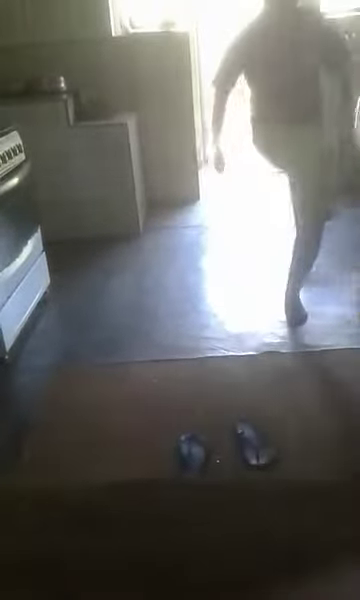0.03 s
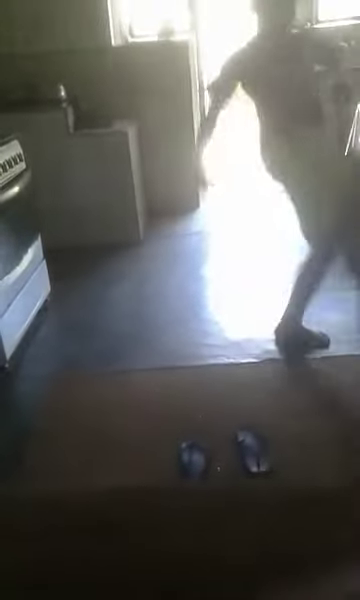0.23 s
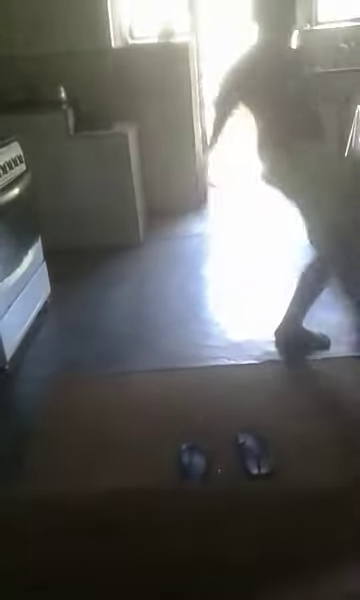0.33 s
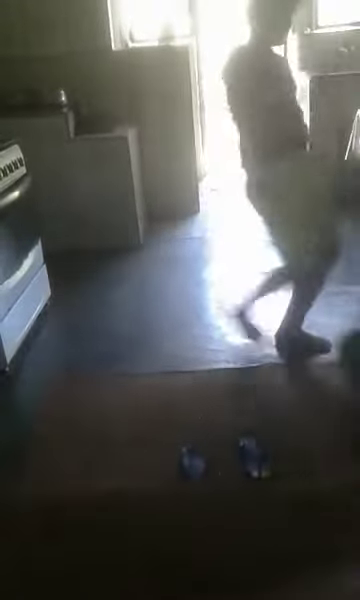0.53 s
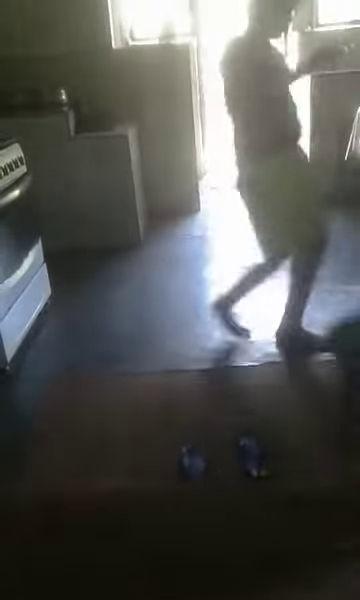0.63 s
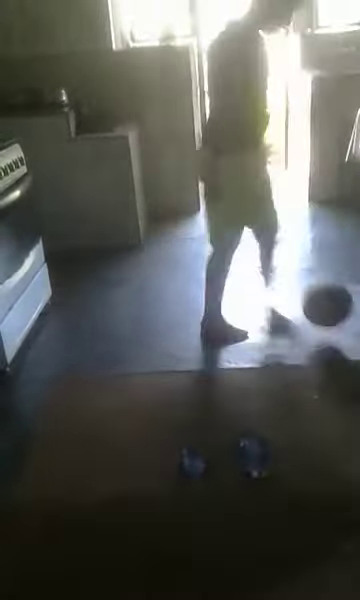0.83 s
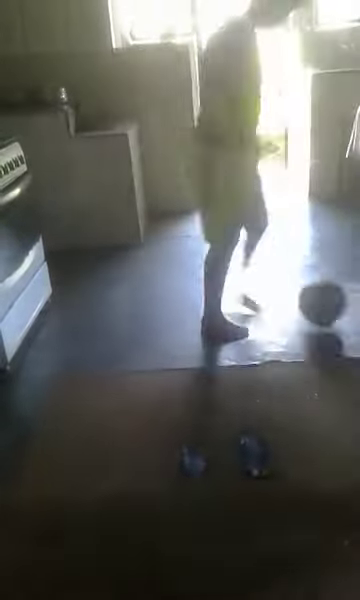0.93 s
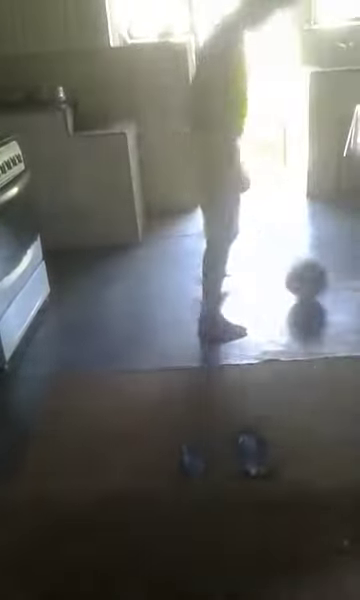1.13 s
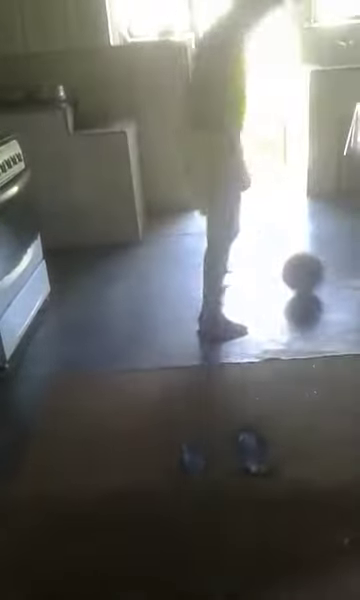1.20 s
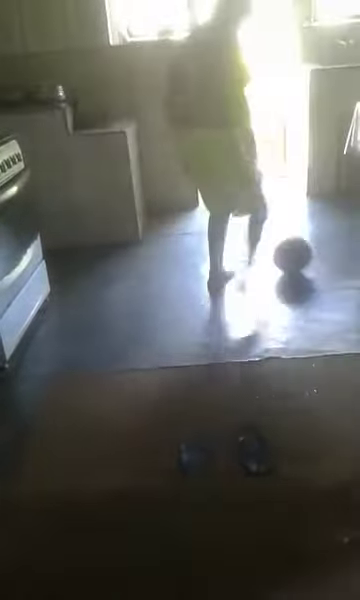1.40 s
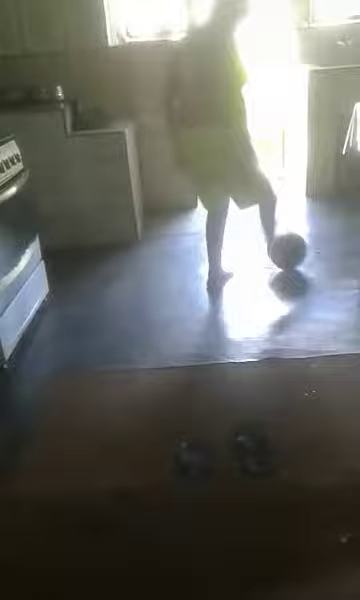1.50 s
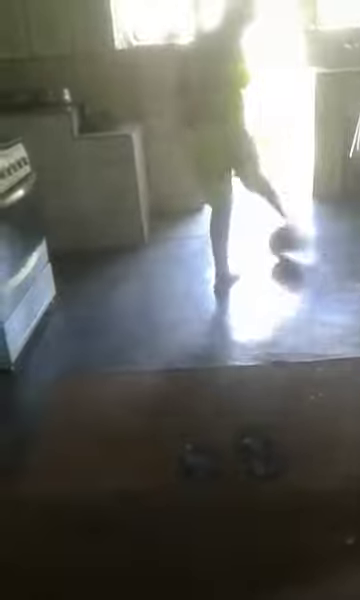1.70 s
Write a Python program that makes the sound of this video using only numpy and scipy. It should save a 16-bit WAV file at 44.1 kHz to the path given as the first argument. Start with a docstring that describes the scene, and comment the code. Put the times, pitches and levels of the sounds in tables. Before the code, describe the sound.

A ball is kicked, slaps a wall with a hollow knock, then bounces more softly over a hard floor. Bare feet scuff and a bird chirps faintly outside. The microphone stands some way off in a bare, echoing room.

```python
"""Quiet air and a faint mains hum fill a bare, hard-floored room; outside the open door a small bird
starts its thin, gliding calls. A barefoot player kicks a light ball, which slaps against a wall:
each impact excites a hollow knock, a low boom and a slap of the ball's skin. The ball then bounces
back over the floor more softly, while friction of feet and clothes scuffs between the blows.
Each sound lingers as reverberation, reaching the one microphone mostly by way of the room."""
import sys
import numpy as np
from scipy import signal
from scipy.fft import rfft, irfft, next_fast_len
from scipy.io import wavfile
from scipy.ndimage import map_coordinates

SR = 44100
rng = np.random.default_rng(int(sys.argv[2]) if len(sys.argv) > 2 else 0)


def wav_out(sig):
    """Save sig, one row per channel (or a flat mono array), as 16-bit PCM at SR to the path in sys.argv[1]."""
    wavfile.write(sys.argv[1], SR, np.round(np.clip(np.atleast_2d(sig).T, -1, 1) * 32767).astype(np.int16))


N = 77175
TIME = np.arange(N) / SR


def amp(db):
    """Amplitude ratio of a level in decibels."""
    return 10 ** (np.asarray(db) / 20)


def unit_rms(x):
    """Normalisation to an rms of 1."""
    return x / np.sqrt(np.mean(x ** 2) + 1e-20)


def along(points, hz):
    """Interpolation of (Hz, value) points on a logarithmic frequency axis."""
    freqs, values = np.transpose(points)
    return np.interp(np.log(hz + 1), np.log(freqs + 1), values)


def wobble(knots_per_s):
    """Random modulation: a smooth curve through Gaussian knots."""
    return map_coordinates(rng.standard_normal(N), [TIME * knots_per_s])


def coloured(x, gain):
    """Minimum-phase filtering: x is shaped causally by gain, a function of frequency."""
    size = 2 * next_fast_len(len(x))
    magnitude = np.maximum(gain(np.fft.rfftfreq(size, 1 / SR)), 1e-6)
    cepstrum = irfft(np.log(magnitude))
    cepstrum[1:size // 2] *= 2
    cepstrum[size // 2 + 1:] = 0
    return irfft(rfft(x, size) * np.exp(rfft(cepstrum)))[:len(x)]


def tilt(hz, db_per_octave):
    """Spectral slope in dB, pivoting at 4 kHz and level below 500 Hz."""
    return db_per_octave * np.log2(np.maximum(hz, 500) / 4000)


# Spectrum of the quiet air. Each row: frequency in Hz, relative level in dB.
AIR_SPECTRUM = [(25, -8.5), (60, -5), (120, 3.5), (220, 2.5), (480, -3.5), (900, -8), (1600, -15),
                (3000, -14.5), (6000, -15.5), (10000, -18.5), (15500, -17.5)]
def room_tone(air_db=-64.5, hum_hz=124, hum_db=-75.5):
    """Ambient noise floor: broadband air noise and the pure tone of a faint mains hum."""
    air = unit_rms(coloured(rng.standard_normal(N), lambda f: amp(along(AIR_SPECTRUM, f))))
    hum = unit_rms(np.sin(2 * np.pi * hum_hz * TIME))
    return amp(air_db + 0.27 * wobble(8.8)) * air + amp(hum_db) * hum


# Reverberation time of the room. Each row: frequency in Hz, time to fall 60 dB in seconds.
REVERB_TIMES = [(60, 0.6), (120, 0.78), (250, 0.52), (350, 0.69), (480, 0.47), (700, 0.48), (1300, 0.6),
                (3000, 0.56), (6000, 0.49), (14000, 0.56)]
def diffuse_tail(build_s=0.015):
    """Diffuse field of energy 1: it builds up, then each frequency decays exponentially at its own rate."""
    hz, t, spectrum = signal.stft(rng.standard_normal(N), SR, nperseg=512)
    decay = amp(-60 * t / along(REVERB_TIMES, hz)[:, None])
    tail = signal.istft(spectrum * decay, SR, nperseg=512)[1][:N]
    tail *= 1 - np.exp(-TIME / build_s)
    return tail / np.linalg.norm(tail)


def in_room(x, wet_db):
    """Reverberation by convolution, added to the direct sound at about constant total power."""
    reverberation = amp(wet_db) * signal.fftconvolve(x, diffuse_tail())[:N]
    return (x + reverberation) / np.hypot(1, amp(wet_db))


# The bird's notes. Each row: start in seconds, length in seconds, first pitch in Hz,
# last pitch in Hz, level in dB.
BIRD_NOTES = [(.0, 0.12, 9100, 6800, -67.5), (.47, 0.058, 7300, 7140, -56), (0.636, 0.046, 5200, 5800, -68),
              (.697, 0.032, 5890, 6440, -50.5), (0.725, 0.063, 6520, 8640, -57.5),
              (1.021, 0.055, 7290, 7300, -61.5), (1.15, 0.098, 8770, 6560, -62.5),
              (1.39, 0.052, 5480, 5900, -71), (1.441, 0.03, 5920, 6480, -60.5),
              (1.47, .07, 6900, 8700, -68), (1.678, 0.044, 5500, 5750, -71)]
def bird(waver_hz=237, wavers_per_s=1100):
    """Frequency modulation: thin whistles glide and waver, and reverberation smears them."""
    whistles = np.zeros(N)
    for start, length, first_hz, last_hz, db in BIRD_NOTES:
        progress = np.clip((TIME - start) / length, 0, 1)
        hz = first_hz + (last_hz - first_hz) * progress + waver_hz * wobble(wavers_per_s)
        envelope = np.sqrt(2 * np.abs(np.sin(np.pi * progress)))
        whistles += amp(db) * envelope * np.sin(2 * np.pi * np.cumsum(hz) / SR)
    return in_room(whistles, wet_db=0)


# Spectrum of the rubbing. Each row: frequency in Hz, relative level in dB.
FRICTION_SPECTRUM = [(50, -26), (200, 1.5), (500, -8), (1300, -7.5), (2200, -0.5), (3200, 0), (5000, 4.5),
                     (7500, 3.5), (10000, -3), (15500, -8.5)]
# Scuffs of feet and clothes. Each row: time of the peak, rise and fall in seconds, level in dB,
# brightness in dB per octave.
SCUFF_SWELLS = [(.203, 0.027, .018, -53, 0), (0.234, 0.023, .015, -44, 3), (0.313, 0.009, 0.011, -39, -6.5),
                (0.836, 0.057, 0.065, -49, -0.5), (.935, 0.06, 0.028, -53, -1),
                (1.2, 0.035, 0.074, -62, 1.5), (.76, 0.069, 0.087, -59.5, 2)]
def scuffs(roughness_db=1.5):
    """Friction noise: soles and cloth rub in swells, made grainy by fast amplitude modulation."""
    swells = np.zeros(N)
    for peak, rise, fall, db, brightness in SCUFF_SWELLS:
        grain = rng.standard_normal(N) * amp(roughness_db * wobble(400))
        rub = coloured(grain, lambda f: amp(along(FRICTION_SPECTRUM, f) + tilt(f, brightness)))
        envelope = np.exp(-((TIME - peak) / np.where(TIME < peak, rise, fall)) ** 2)
        swells += amp(db) * unit_rms(rub) * envelope
    return in_room(swells, wet_db=-1.5)


# Early wall echoes. Each row: delay in seconds, level in dB relative to the direct sound.
WALL_REFLECTIONS = [(.0085, 0), (.0215, -13), (.033, -2.5), (.042, -2.5)]
# Room modes. Each row: frequency in Hz, relative level in dB, time to fall 60 dB in seconds.
STANDING_WAVES = [(97.8, -22, 0.41), (340.6, -15.5, 0.88), (440, -13, 0.68), (559, -15, 0.55),
                  (614, -18, 0.28)]
def room_response(direct_db=-17, modes_db=-16):
    """Impulse response: direct sound, wall reflections, diffuse tail and standing waves superpose."""
    response = diffuse_tail()
    response[0] += amp(direct_db)
    for delay, db in WALL_REFLECTIONS:
        arrival_s = abs(delay + rng.normal(0, 0.0006))
        response[round(arrival_s * SR)] += amp(direct_db + db)
    for hz, db, t60 in STANDING_WAVES:
        mode = np.sin(2 * np.pi * (hz * TIME + rng.random())) * np.exp(-np.log(1000) * TIME / t60)
        response += amp(modes_db + db) * mode / np.linalg.norm(mode)
    return response


# Spectrum of the low boom. Each row: frequency in Hz, relative level in dB.
BOOM_SPECTRUM = [(25, -20), (42, -2.5), (58, -1.5), (82, -1.5), (98, 0.5), (130, -3), (200, -2.5),
                 (245, -8), (330, -0.5), (600, -4.5), (2000, -86)]
def knock_and_boom(knock_db, knock_hz, width_hz, boom_db, punch_db):
    """Resonance: the ball knocks hollowly over a low boom, colouring the impulse and its echoes alike."""
    def gain(f):
        band = 1 / np.hypot(1, ((f * f - knock_hz ** 2) / (f * width_hz + 1)) ** 2)  # flat-topped
        skirt = amp(-14) * np.minimum(f / knock_hz, 1) / (1 + (f / 1050) ** 8)  # weak spill outside it
        knock = amp(knock_db) * np.hypot(band, skirt)
        return np.hypot(knock, amp(boom_db + along(BOOM_SPECTRUM, f)))

    # Dense first echoes from floor and furniture.
    cluster = rng.standard_normal(N) * np.exp(-(TIME / 0.067) ** 2)
    cluster *= amp(-1) / np.linalg.norm(cluster)
    punch = amp(punch_db) * (TIME == 0)
    return coloured(punch + cluster + room_response(), gain)


# Spectrum of the skin's slap. Each row: frequency in Hz, relative level in dB.
SLAP_SPECTRUM = [(100, -20), (600, -4), (1100, -8), (1500, -9.5), (2300, -2.5), (3200, -6), (5000, -1),
                 (7200, -4), (9500, -13), (15500, -23)]
def skin_slap(slap_db, brightness, crack_db, contact_s, rise_s=0.002):
    """Contact transient: the ball's skin gives a broadband crack, and the room answers in that colour."""
    crack = rng.standard_normal(N) * np.exp(-2 * TIME / contact_s) * (1 - np.exp(-TIME / rise_s))
    crack *= amp(crack_db) / np.linalg.norm(crack)
    excitation = crack + room_response()
    return coloured(excitation, lambda f: amp(slap_db + along(SLAP_SPECTRUM, f) + tilt(f, brightness)))


# Blows of ball and foot. Each row: start in seconds, knock level in dB, knock pitch and bandwidth in Hz,
# boom, direct punch and slap levels in dB, slap brightness in dB per octave, crack level in dB,
# contact time in seconds. All levels are relative.
IMPACTS = [(0.2085, -22.5, 520, 494, -20, -10.5, -35.5, -4, -3, 0.018),
           (.3550, -12.5, 570, 163, -14, -13.5, -25.5, -2.2, -8, 0.0067),
           (.6120, -27.5, 543, 370, -37, -7.5, -45.5, 0.5, 0, 0.0083),
           (.7400, -37, 517, 297, -44, -21, -61, -6, -12, .01),
           (0.834, -54, 450, 404, -44.5, -9, -64, 3, -8, .01),
           (0.9484, -30, 410, 266, -39, -8, -45, 0.5, -4, 0.0028),
           (1.1196, -31.5, 516, 248, -41.5, -10, -53.5, 1, -4, 0.0069),
           (1.334, -55, 563, 407, -56, -5, -66, 2.5, -4.5, 0.0074),
           (1.7204, -34, 460, 262, -36, -14.5, -42.5, 3.5, -21.5, 0.0038)]
# One such row for a blow that is already dying away as the scene opens.
FADING_IMPACT = (-.15, -31.5, 424, 354, -36, -8, -39, -2, -8, 0.4)
def ball(gain_db=35):
    """Impact excitation: each blow sounds a knock, a boom and a slap, and their decays superpose."""
    blows = np.zeros(N)
    for start_s, *settings in [FADING_IMPACT] + IMPACTS:
        blow = knock_and_boom(*settings[:5]) + skin_slap(*settings[5:])
        start = round(start_s * SR)
        heard = blow[max(-start, 0):N - max(start, 0)]
        blows[max(start, 0):][:len(heard)] += heard
    return amp(gain_db) * blows


def scene():
    """Superposition: all sources add at one microphone, alike in both channels."""
    return np.tile(ball() + scuffs() + bird() + room_tone(), (2, 1))


def record(dry, low_cut_hz=35, top_hz=15850):
    """Band limiting: the microphone loses the deepest bass, the recorder the highest treble."""
    low_cut = signal.butter(4, low_cut_hz, 'highpass', fs=SR, output='sos')
    size = next_fast_len(N + SR // 2)
    spectrum = rfft(signal.sosfilt(low_cut, dry), size)
    passband = np.fft.rfftfreq(size, 1 / SR) < top_hz
    return irfft(spectrum * passband, size)[:, :N]


dry = scene()
out = record(dry)
wav_out(out)
```